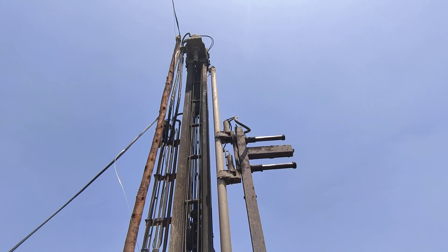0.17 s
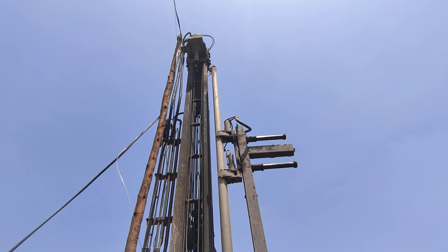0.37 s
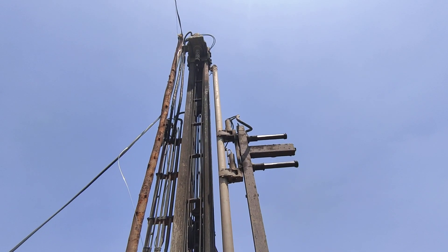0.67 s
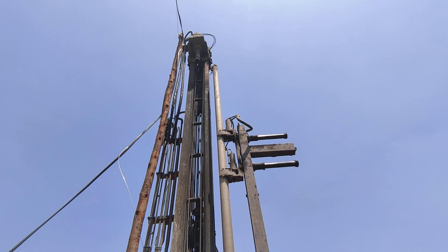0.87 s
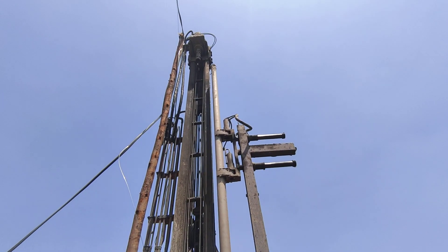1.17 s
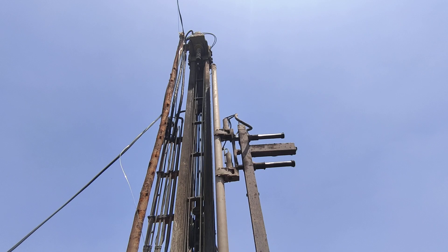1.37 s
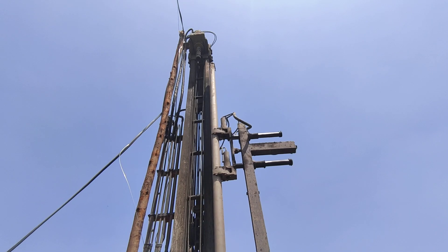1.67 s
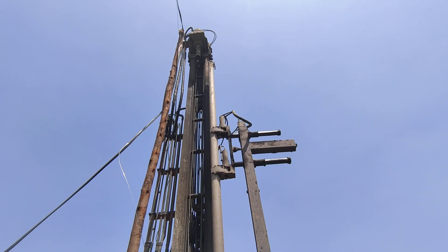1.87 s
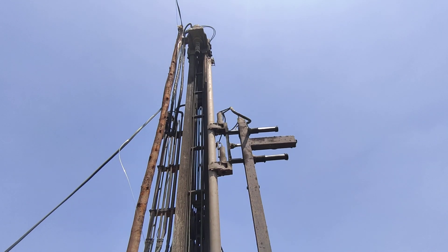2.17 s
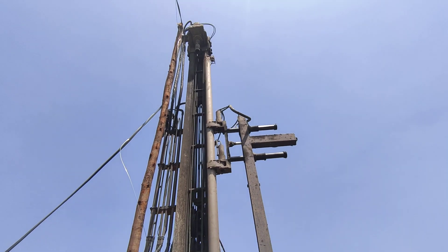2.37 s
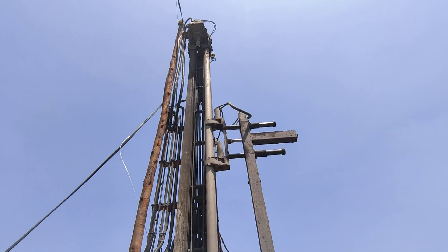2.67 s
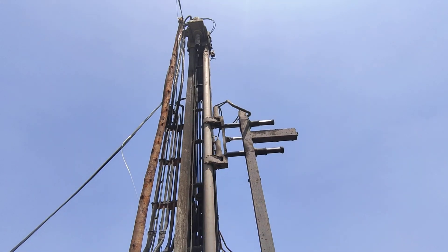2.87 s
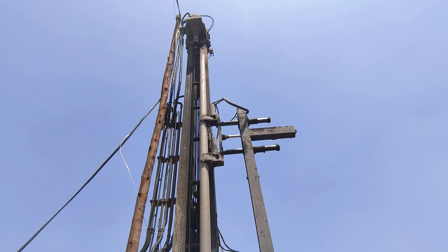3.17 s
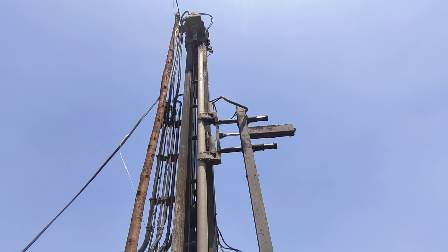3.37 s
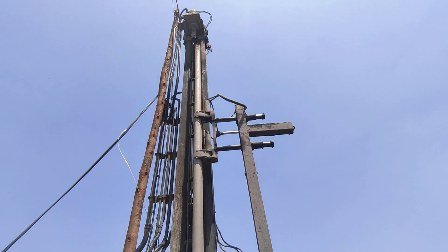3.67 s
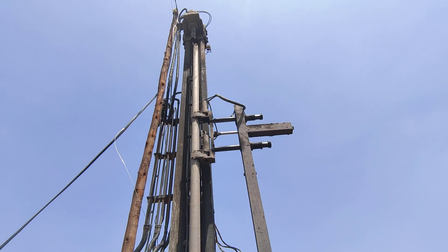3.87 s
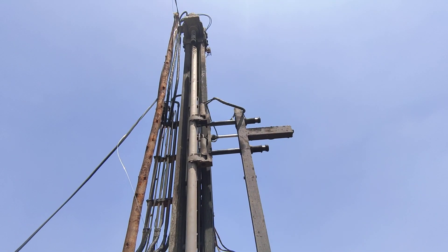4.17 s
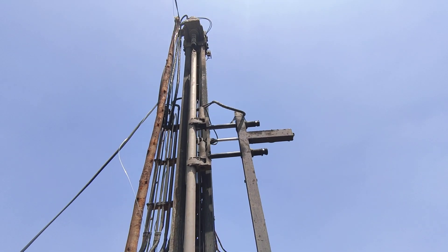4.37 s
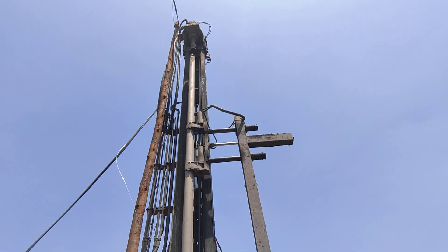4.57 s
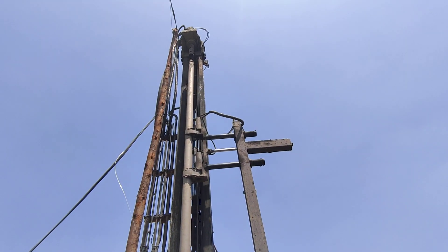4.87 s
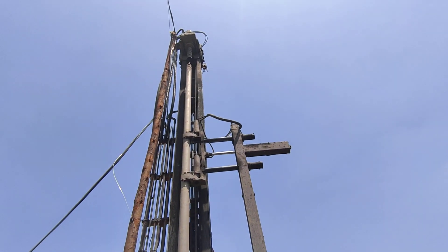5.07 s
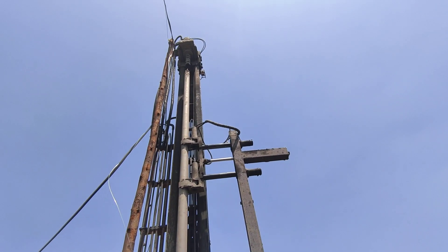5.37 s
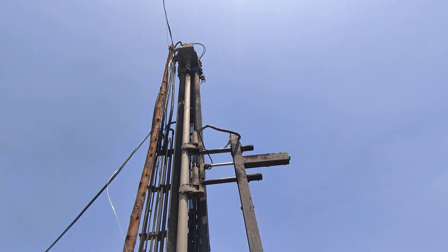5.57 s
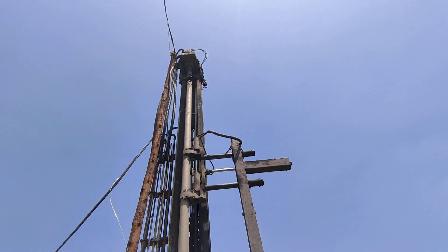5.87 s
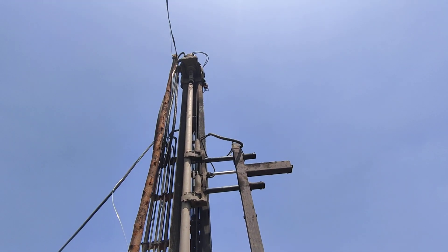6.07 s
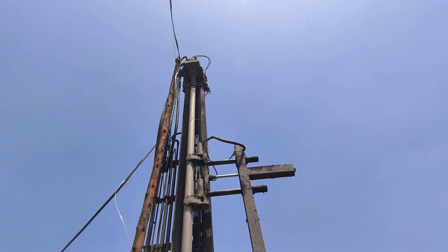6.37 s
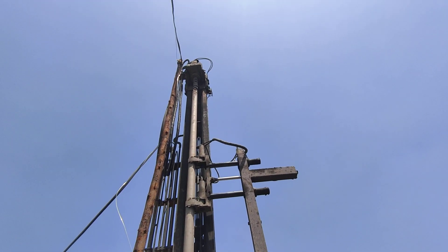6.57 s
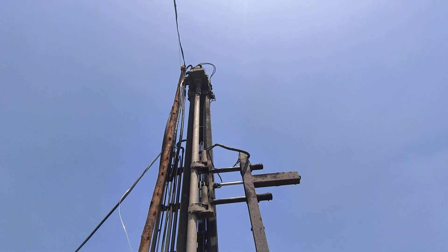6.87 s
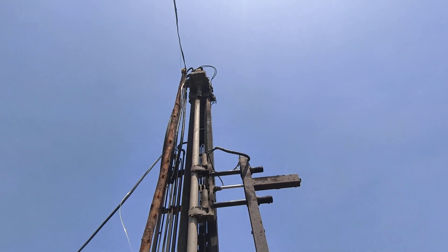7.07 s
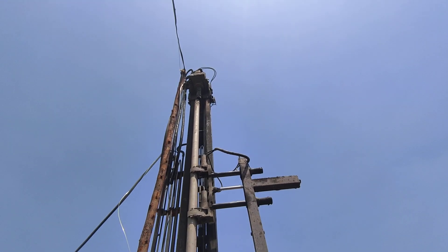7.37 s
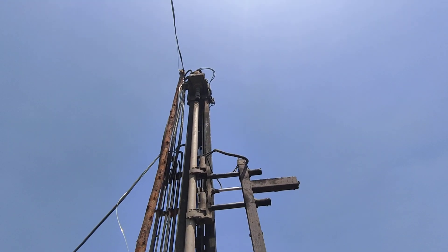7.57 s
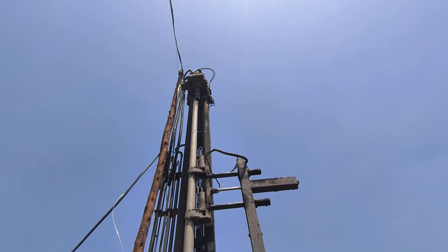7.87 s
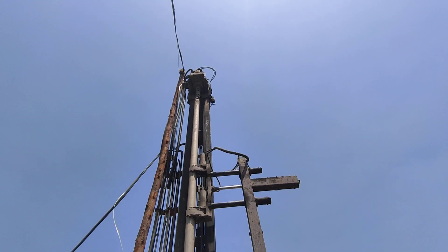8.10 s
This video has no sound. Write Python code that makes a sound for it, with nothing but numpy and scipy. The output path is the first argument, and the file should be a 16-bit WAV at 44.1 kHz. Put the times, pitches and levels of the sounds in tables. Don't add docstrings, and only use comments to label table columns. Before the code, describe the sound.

Outdoors near a working drilling rig, a diesel engine drones over deep rumble with a steady compressor hum and distant fans. At about two seconds a clank brings a sustained rush of compressed air. Steel pipe then knocks, squeals briefly and scrapes in its guides, and the end grows loud with grinding and air spurts. A small microphone gives limited bass and dull treble.

```python
import sys
import numpy as np
from scipy import signal
from scipy.fft import rfft, irfft, next_fast_len
from scipy.io import wavfile
from scipy.ndimage import uniform_filter1d, map_coordinates

SR = 44100
rng = np.random.default_rng(int(sys.argv[2]) if len(sys.argv) > 2 else 0)


def boost_factor(decibels):
    exponent = np.asarray(decibels, float) / 20
    return 10 ** exponent


def output_pcm(signal):
    pcm = np.clip(np.atleast_2d(signal).T, -1, 1) * 32767
    wavfile.write(sys.argv[1], SR, np.round(pcm).astype(np.int16))


N = 363119
TIME = np.arange(N) / SR
COARSE_TIME = TIME[::32]


def unit(x):
    return x / np.sqrt(np.mean(x ** 2) + 1e-20)


def curves(rows):
    start_s, *columns = np.transpose(rows)
    return [np.interp(TIME, start_s, column) for column in columns]


def wobble(rate_hz):
    knots = rng.standard_normal(int(N * rate_hz / SR) + 4)
    return np.interp(TIME, COARSE_TIME, map_coordinates(knots, [COARSE_TIME * rate_hz]))


def filtered(x, response):
    size = next_fast_len(N + SR // 2)
    return irfft(rfft(x, size) * response(np.fft.rfftfreq(size, 1 / SR)), size)[:N]


def resonances(modes):
    def response(f):
        total = 0
        for k, (hz, width, db) in enumerate(modes):
            damping = 1j * f * width
            total = total + (-1) ** k * boost_factor(db) * damping / (hz * hz - f * f + damping)
        return total
    return response


def rush(spectrum, patchy_db):
    z = signal.stft(rng.standard_normal(N), nperseg=512)[2]
    field = uniform_filter1d(rng.standard_normal(z.shape), size=6, axis=0)
    field = uniform_filter1d(field, size=12, axis=1)
    noise = signal.istft(z * boost_factor(patchy_db * unit(field)), nperseg=512)[1][:N]
    f, level_db = np.transpose(spectrum)
    return unit(filtered(noise, lambda hz: boost_factor(np.interp(np.log(hz + 1), np.log(f + 1), level_db))))


def tone(hz, db, flutter_db, drift):
    phase = 2 * np.pi * np.cumsum(hz + np.zeros(N)) / SR + drift * wobble(4) + rng.uniform(0, 2 * np.pi)
    return np.sqrt(2) * boost_factor(db + flutter_db * wobble(5)) * np.sin(phase)


def swells(rows, attack_s, release_t60):
    power = 0
    for s, length, db in rows:
        rise = np.clip((COARSE_TIME - s) / attack_s, 0, 1)
        fall_db = -60 * np.maximum(COARSE_TIME - s - length, 0) / release_t60
        power = power + (rise * boost_factor(db + fall_db)) ** 2
    return np.interp(TIME, COARSE_TIME, np.sqrt(power))


def held(rows):
    return [row[:3] for row in rows]


def raised(rows):
    return [(s, length, db + more_db) for s, length, db, more_db in rows]


# pitch_hz, density_db (per Hz)
YARD_SPECTRUM = [(280, -35.5), (480, -11.5), (727, -0.5), (788, -2), (844, 0), (1350, -32), (1690, -6.5),
                 (1770, -20.5), (1890, -9.5), (2830, -26), (5470, -53), (6500, -23.5), (7550, -39),
                 (9820, -66.5), (16600, -120)]


def yard():
    return boost_factor(-46.5) * rush(YARD_SPECTRUM, patchy_db=0.9)


# order (multiple of shaft speed), level_db (rms)
COMPRESSOR_ORDERS = [(2.5, -48), (4, -42.5), (5, -41), (8, -46.5), (10, -40), (16, -36)]


def compressor():
    shaft_hz = 17.77
    return sum(tone(order * shaft_hz, db, flutter_db=2.5, drift=0.25) for order, db in COMPRESSOR_ORDERS)


# pitch_hz, density_db (per Hz)
DEEP_SPECTRUM = [(18, -45), (30, -8), (107, 4.5), (180, -3), (230, -36), (400, -120)]
# pitch_hz, density_db (per Hz)
CASING_SPECTRUM = [(88, -38.5), (150, -9), (210, 0), (280, 0.5), (335, -3.5), (370, -8.5), (430, -11.5),
                   (500, -17), (680, -48), (1140, -120)]
# start_s, length_s, level_db
FRAME_BOOMS = [
    (0.2, 0.083, -33),
    (0.9, 0.12, -33),
    (3.25, 0.15, -33),
    (4.22, 0.15, -31),
    (4.85, 0.25, -25.5),
    (5.85, 0.1, -27),
    (6.8, 0.35, -32),
    (7.38, 0.091, -24),
]


def rumble(shaft_hz, load_db):
    throb = 1 + 0.02 * np.sin(2 * np.pi * np.cumsum(shaft_hz) / SR)
    booms = swells(FRAME_BOOMS, attack_s=0.049, release_t60=0.98)
    deep = np.hypot(boost_factor(-32.5 + 0.21 * load_db), booms)
    grinding = boost_factor(-3.0) * swells(held(PIPE_STROKES), attack_s=0.03, release_t60=0.72)
    casing = np.hypot(boost_factor(-31.5 + 0.45 * load_db), grinding)
    return throb * (deep * rush(DEEP_SPECTRUM, patchy_db=1.36) + casing * rush(CASING_SPECTRUM, patchy_db=0.8))


# start_s, shaft_hz, load_db, pump_db (whine)
GOVERNOR = [(0.0, 22.06, 2, -45), (0.18, 22.63, 1.5, -52), (0.5, 22.14, -1, -53), (0.8, 21.95, -5.5, -47),
            (1.2, 21.82, -4, -34.5), (1.88, 21.74, -3.5, -35.5), (2.0, 21.63, 3.5, -29.5),
            (2.28, 21.43, 4, -31.5), (2.85, 21.73, -0.5, -32), (3.2, 21.86, 1.5, -32.5),
            (3.6, 21.91, -3, -41), (4.9, 21.99, 0, -41.5), (5.22, 21.68, 3.5, -34), (5.9, 22.09, -4, -44.5),
            (6.45, 22.04, 0.5, -49), (7.35, 21.94, 2, -40), (7.68, 21.65, 4, -34.5), (8.23, 21.84, 5, -36)]
# order (multiple of shaft speed), level_db (rms)
EXHAUST_ORDERS = [(3, -52), (6, -37.5), (9, -46), (12, -41.5), (15, -50), (18, -65), (25, -54.5),
                  (38, -55.5)]
# order, level_db (rms at rated speed), sag_db (per Hz of sag), load_share
LOADED_ORDERS = [(5, -38.5, 4.5, 0.9), (19, -40.5, -11.5, 0.6), (19.5, -46, 3.5, 0.72),
                 (20, -44.5, 12.5, -0.93)]


def engine():
    shaft_hz, load_db, pump_db = curves(GOVERNOR)
    sag_hz = 21.85 - shaft_hz
    out = tone(10 * shaft_hz, pump_db + 0.8, flutter_db=0.6, drift=0.19)
    for order, db, sag_db, share in LOADED_ORDERS:
        out = out + tone(order * shaft_hz, db + sag_db * sag_hz + share * load_db, flutter_db=0.77, drift=0.27)
    for order, db in EXHAUST_ORDERS:
        out = out + tone(order * shaft_hz, db, flutter_db=0.0, drift=0.33)
    return out + rumble(shaft_hz, load_db)


# start_s, level_db (flow, as hiss level)
AIR_FLOW = [(0.0, -60.5), (0.2, -67.5), (0.93, -70), (1.15, -63.5), (1.35, -67), (1.91, -66), (1.97, -45),
            (2.1, -48), (2.3, -44.5), (5.3, -44), (5.55, -46), (7.1, -46), (7.43, -44.5), (7.49, -55),
            (7.54, -49), (7.9, -50.5), (8.23, -50.5)]


def driven(open_db, per_flow_db, swung_db):
    swing = np.clip((TIME - 4.8) / 0.59, 0, 1)
    flow_db = curves(AIR_FLOW)[0] + 44
    return boost_factor(open_db + per_flow_db * flow_db + swung_db * swing)


# pitch_hz, density_db (per Hz)
HISS_SPECTRUM = [(2900, -48), (4900, -15), (5300, -4), (5700, -4.5), (5950, 0), (6400, 4), (6800, 7),
                 (7150, 8), (7500, 5.5), (16500, -120)]


def hiss(puffs):
    return np.hypot(boost_factor(curves(AIR_FLOW)[0]), puffs) * rush(HISS_SPECTRUM, patchy_db=1.0)


# pitch_hz, density_db (per Hz)
JET_SPECTRUM = [(1350, -6), (2300, 0.5), (2500, -1.5), (2730, -1.5), (2880, -4.5), (3250, 2.5), (3680, -7),
                (4010, -14.5), (4600, -25.5), (5980, -43.5), (10100, -120)]


def jet():
    spurts = swells(raised(AIR_PUFFS), attack_s=0.012, release_t60=0.12)
    flow = driven(open_db=-46.5, per_flow_db=0.73, swung_db=2.65)
    return np.hypot(flow, spurts) * rush(JET_SPECTRUM, patchy_db=-0.3)


# pitch_hz, density_db (per Hz)
RIM_SPECTRUM = [(2600, -120), (3700, -10.5), (4100, -1), (4600, 0.5), (5100, -0.5), (5500, -12.5),
                (7500, -120)]


def rim(puffs):
    flow = driven(open_db=-58, per_flow_db=0.74, swung_db=-1.5)
    return np.hypot(flow, boost_factor(-12) * puffs) * rush(RIM_SPECTRUM, patchy_db=-0.3)


# start_s, length_s, level_db
SEAT_LEAK = (7.52, 0.35, -60.5)
# pitch_hz, density_db (per Hz)
SEAT_SPECTRUM = [(3300, -40), (3800, -6), (4050, 0), (4350, -6), (4900, -40)]


def leak():
    return swells([SEAT_LEAK], attack_s=0.08, release_t60=0.3) * rush(SEAT_SPECTRUM, patchy_db=4.0)


# pitch_hz, width_hz, level_db
COLUMN_MODES = [(763, 18, -3), (874, 47, -1.5), (1620, 24, -8), (1800, 120, -5.5), (1848, 20, -6.5),
                (2083, 22, -9), (2356, 18, -6.5), (2695, 26, -8), (3230, 56, -13.5), (3880, 36, -20.5),
                (4595, 80, -15.5), (5230, 31, -11), (5920, 60, -10.5), (6380, 39, -16.5)]


def air_column():
    ring = resonances(COLUMN_MODES)
    column = unit(filtered(rng.standard_normal(N), lambda f: np.abs(ring(f)) ** 1.56))
    return driven(open_db=-42.5, per_flow_db=2.9, swung_db=0) * boost_factor(1.6 * wobble(3)) * column


# start_s, length_s, level_db (hiss), jet_db (above the hiss)
AIR_PUFFS = [(0.035, 0.01, -61, -3), (0.291, 0.012, -57.5, -7), (0.324, 0.008, -61.5, -8),
             (1.246, 0.008, -60.5, -8), (1.937, 0.04, -47.5, 3.5), (5.2, 0.1, -50.5, 6.5),
             (7.2, 0.03, -46.5, 3), (7.939, 0.054, -45.5, 6.5), (8.02, 0.023, -50, 12),
             (8.057, 0.015, -39.5, 0), (8.089, 0.045, -40.5, 7)]


def air():
    flutter = boost_factor(0.23 * wobble(16) + 0.29 * wobble(45) + 0.65 * wobble(7))
    puffs = swells(held(AIR_PUFFS), attack_s=0.012, release_t60=0.1)
    return flutter * (hiss(puffs) + jet() + rim(puffs) + leak() + air_column())


# start_s, length_s, pitch_hz, level_db (rms)
SINGING_PIPE = [(0, .32, 1270, -46), (1.109, 0.53, 1640, -52), (4.601, 0.35, 278, -29.5),
                (5.168, 0.022, 1410, -33), (5.17, 0.017, 2229, -37), (5.26, .03, 1444, -39),
                (5.446, 0.053, 1430, -27.5), (5.511, 0.026, 1265, -25), (5.555, 0.024, 1660, -32.5),
                (5.563, 0.044, 671, -24.5), (6.876, 0.024, 590, -27), (6.888, 0.013, 850, -25),
                (6.886, .015, 1840, -34), (7.15, 0.028, 960, -24.5), (7.163, 0.025, 1300, -30),
                (7.525, 0.014, 1163, -26), (7.539, 0.089, 669, -23), (7.636, 0.073, 635, -26.5),
                (7.685, .24, 599, -26.5), (7.7, .3, 1195, -38), (7.97, 0.035, 1620, -26),
                (7.98, 0.088, 301, -22), (8.06, 0.13, 540, -22), (8.074, 0.1, 246, -22.5),
                (8.077, 0.038, 754, -21), (8.09, 0.029, 1190, -21)]


def singing():
    out = np.zeros(N + SR)
    for s, length, hz, db in SINGING_PIPE:
        t = np.arange(round((length + 0.1) * SR)) / SR
        shape = np.clip(t / 0.005, 0, 1) * boost_factor(-60 * np.maximum(t - length, 0) / 0.054)
        size, phase = (map_coordinates(knots, [40 * t]) for knots in rng.standard_normal((2, 44)))
        wave = np.sin(2 * np.pi * hz * t + 0.5 * phase)
        out[round(s * SR):][:len(t)] += boost_factor(db - 3.5 + 1.5 * size) * shape * wave
    return out[:N]


# start_s, level_db (peak), knock_db (above the tick)
METAL_TICKS = [(0.959, -38.5, -0.5), (0.969, -31, 0.5), (1.1417, -38.5, 2.5), (1.1817, -41.5, -12.5),
               (1.8772, -50, 2.5), (1.956, -31, 7.5), (2.0585, -40.5, 11), (4.741, -44.5, 24),
               (7.018, -25.5, -12.5), (7.937, -34, 3.5), (7.968, -36, 15), (8.0668, -36, 10),
               (8.097, -27.5, 14.5), (8.1162, -26, 5)]
# pitch_hz, density_db (per Hz)
CLICK_SPECTRUM = [(2200, -30), (3400, -11), (4400, -5), (5000, -2), (5600, -5), (6200, -1), (7000, -1),
                  (7600, -3)]
# pitch_hz, width_hz, level_db
KNOCK_MODES = [(1300, 150, -1.5), (1980, 460, -0.5), (2860, 540, -9)]


def ticks():
    bright, dull = np.zeros(N + SR), np.zeros(N + SR)
    t = np.arange(SR // 5) / SR
    for s, db, knock_db in METAL_TICKS:
        start = round(s * SR)
        bright[start:][:len(t)] += boost_factor(db - 5.5 - 60 * t / 0.086) * np.clip(t / 0.001, 0, 1)
        dull[start:][:len(t)] += boost_factor(db + knock_db - 13.0 - 60 * t / 0.079) * np.clip(t / 0.0035, 0, 1)
    click = bright[:N] * rush(CLICK_SPECTRUM, patchy_db=-1.0)
    knock = filtered(boost_factor(20.5) * dull[:N] * rng.standard_normal(N), resonances(KNOCK_MODES))
    return click + knock


# start_s, level_db (peak), t60_s
STEEL_SNAP = (4.7382, -14.5, .022)


def snap():
    s, db, t60 = STEEL_SNAP
    t = np.maximum(TIME - s, 0)
    envelope = (TIME >= s) * boost_factor(db - 60 * t / t60) * np.clip(t / 0.0041, 0, 1)
    low, high = resonances([(2050, 900, 1)]), resonances([(6400, 1900, 3)])
    return filtered(envelope * rng.standard_normal(N), lambda f: low(f) ** 2 + high(f) ** 2)


# start_s, length_s, level_db (roar), scrape_db (above the roar)
PIPE_STROKES = [(0.0, 0.2, -45.5, -7), (0.95, 0.042, -46, 4), (1.953, 0.028, -29, -5.5),
                (2.02, 0.085, -38.5, -4), (4.672, 0.05, -35, -11), (5.165, 0.03, -39, 1),
                (5.248, 0.03, -42, 3), (5.438, 0.049, -37, 3), (5.495, 0.081, -28, -1.5),
                (5.616, 0.37, -44, 1.5), (6.02, 0.02, -35, -3), (6.08, 0.15, -37.5, -0.5),
                (6.209, 0.27, -39.5, 0), (6.88, 0.037, -29, -6.5), (7.132, 0.052, -30.5, -2),
                (7.491, 0.78, -30, -5), (7.549, 0.029, -27, -5.5), (7.825, 0.03, -36, -6),
                (7.948, 0.052, -30.5, 5), (7.991, 0.04, -26.5, -2), (8.065, 0.083, -22, 1.5),
                (8.161, 0.025, -27, 6.5), (8.194, 0.051, -21.5, -12)]
# pitch_hz, density_db (per Hz)
ROAR_SPECTRUM = [(260, -17.5), (450, 0), (488, 3.5), (713, 2), (852, -1.5), (975, -5.5), (1050, -29),
                 (1360, -46), (2310, -120)]
# pitch_hz, density_db (per Hz)
SCRAPE_SPECTRUM = [(580, -30), (980, 7), (1030, 1), (1230, 4), (1440, 2.5), (1560, -0.5), (1790, -2),
                   (1960, -6.5), (2450, -12.5), (3180, -44.5), (5390, -120)]


def steel():
    steady = driven(open_db=-38.5, per_flow_db=0.23, swung_db=2.23) * boost_factor(0.52 * wobble(10))
    roar = np.hypot(steady, swells(held(PIPE_STROKES), attack_s=0.02, release_t60=0.37))
    scrape_strokes = swells(raised(PIPE_STROKES), attack_s=0.02, release_t60=0.22)
    scrape = np.hypot(boost_factor(-6) * steady, scrape_strokes)
    chatter = boost_factor(0.4 * wobble(30) + 0.52 * wobble(18))
    return chatter * (roar * rush(ROAR_SPECTRUM, patchy_db=0.5) + scrape * rush(SCRAPE_SPECTRUM, patchy_db=0.06))


def scene():
    background = yard() + compressor() + engine()
    return (background + air() + singing() + ticks() + snap() + steel())[None]


def roll_off(x):
    return signal.sosfilt(signal.butter(12, 8890, fs=SR, output="sos"), x)


def record(dry):
    bass_hz, top_hz = 38, 7555
    kept = filtered(dry[0], lambda hz: (hz < top_hz) * hz ** 4 / (hz ** 4 + bass_hz ** 4))
    return roll_off(kept[None])


dry = scene()
out = record(dry)
output_pcm(out)
```